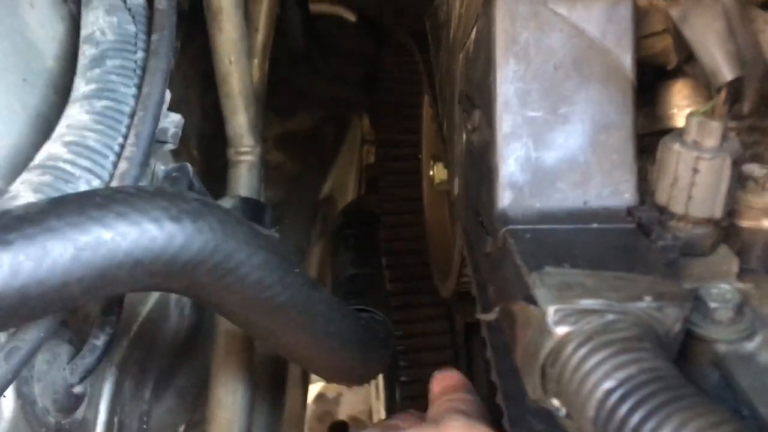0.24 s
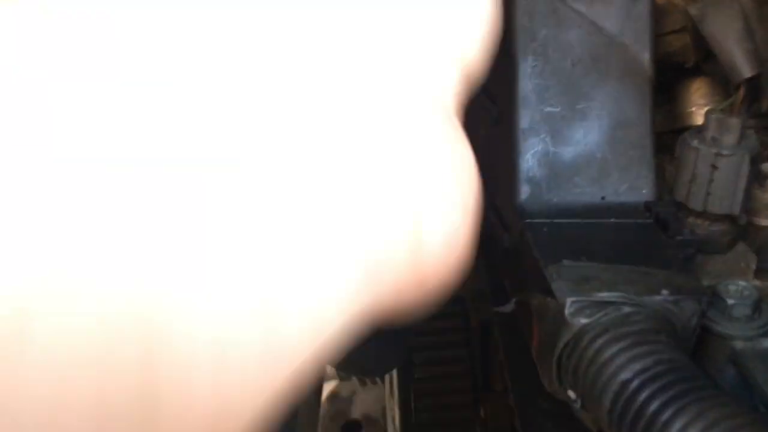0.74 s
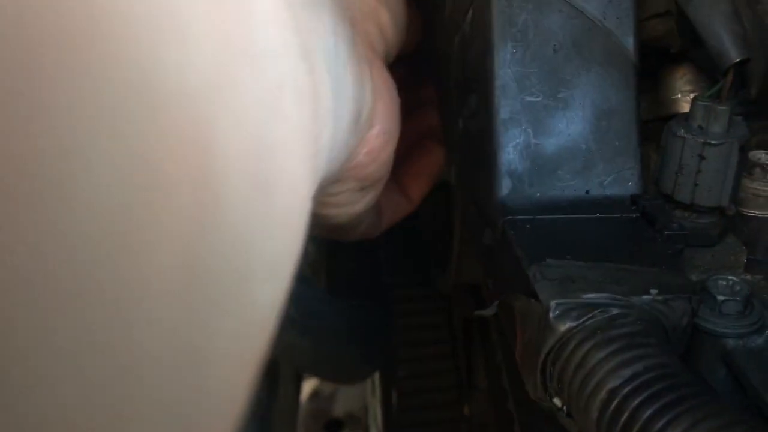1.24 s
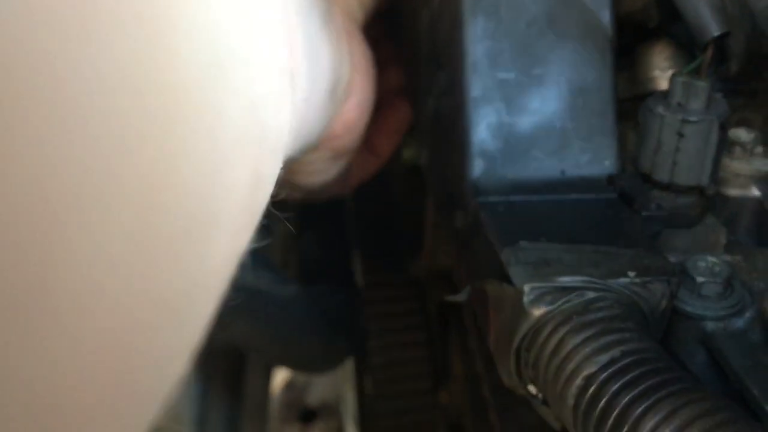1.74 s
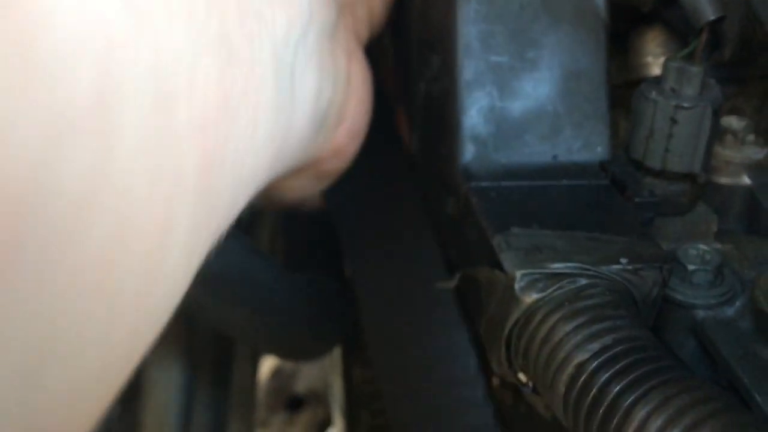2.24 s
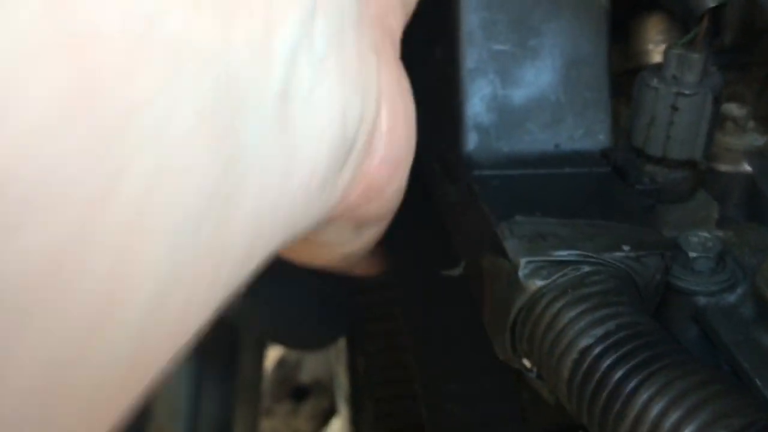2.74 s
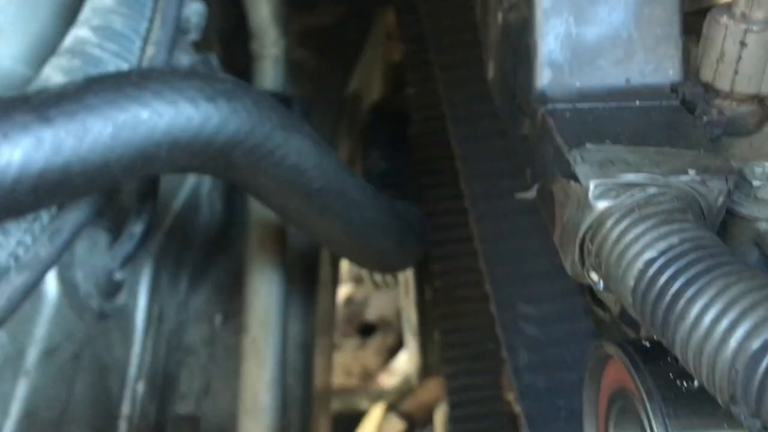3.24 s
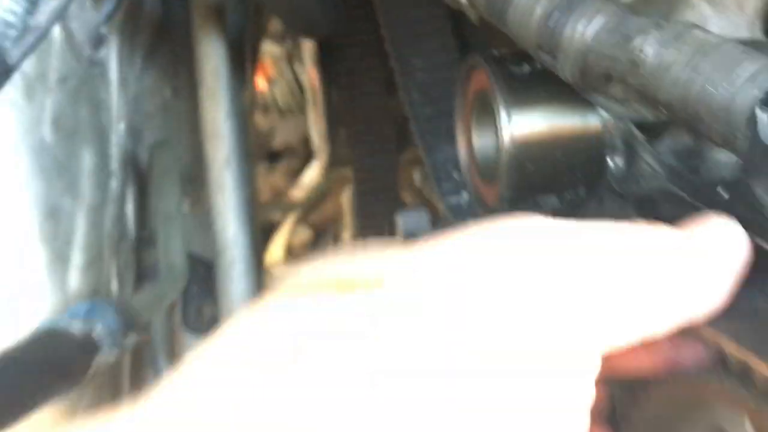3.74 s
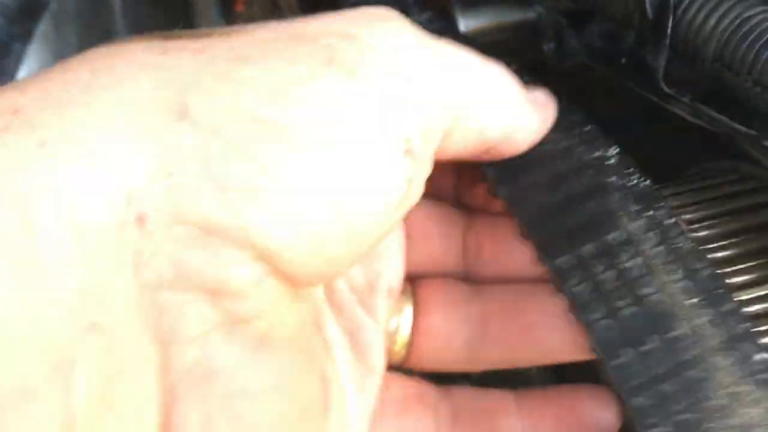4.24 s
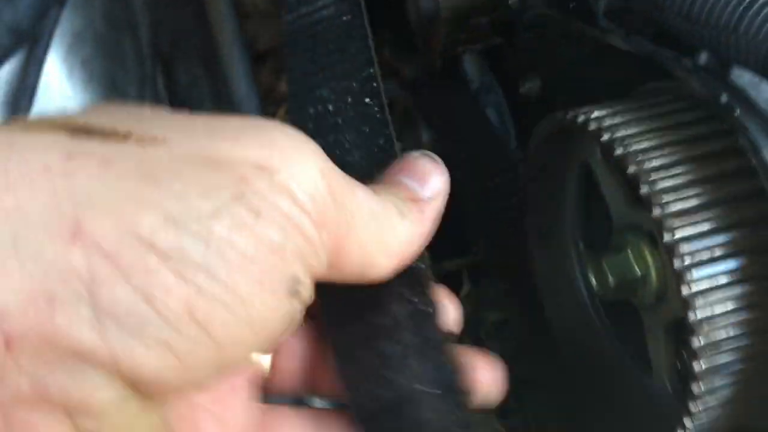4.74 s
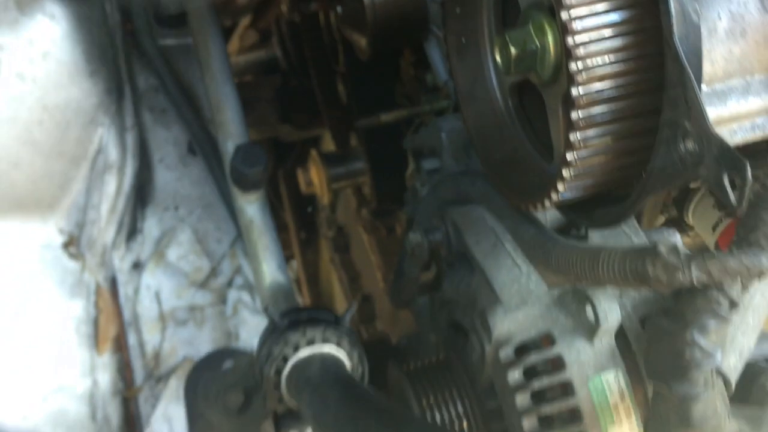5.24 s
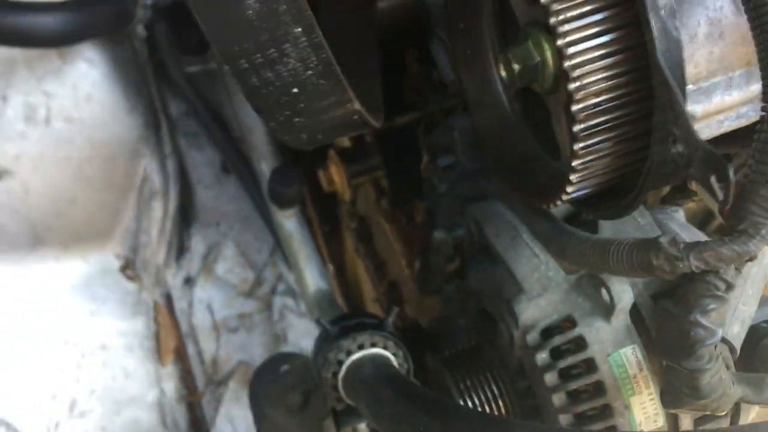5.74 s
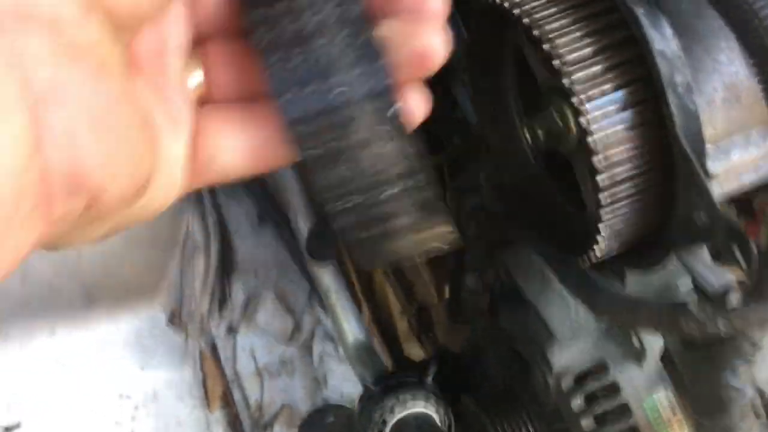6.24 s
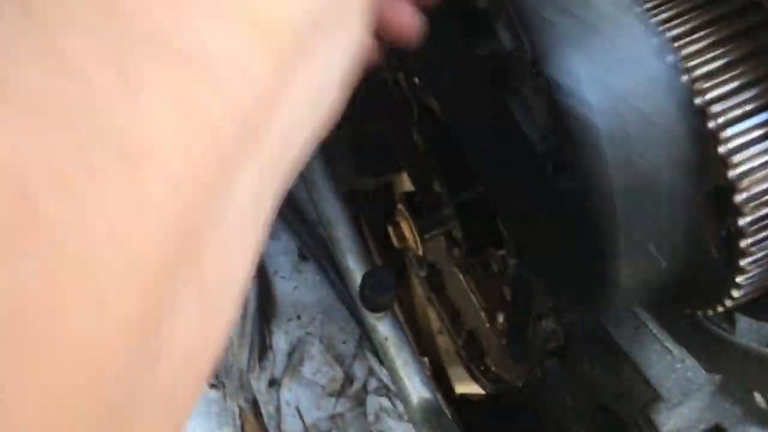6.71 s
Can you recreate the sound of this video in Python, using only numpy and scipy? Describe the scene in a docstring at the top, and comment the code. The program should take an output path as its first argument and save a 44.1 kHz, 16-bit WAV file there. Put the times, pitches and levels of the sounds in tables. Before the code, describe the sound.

One sharp metallic snap, then faint rubbing and ticking as a rubber engine belt is pulled off and slaps against metal in a humming garage.

```python
"""A toothed rubber timing belt is worked off its sprockets by hand in a humming garage.
First a metal part snaps sharply and rings in its modes. Then friction takes over: skin hisses, rubber
rasps and creaks, small parts tick and a steel pulley rings under taps and scrapes. From about 3.5 s the
freed belt slides through the hand, until it slaps hard against the engine at 4.9 s. More rubbing follows,
and a cluster of slaps and pulley rings closes the scene near 6.8 s."""
import sys
import numpy as np
from scipy import signal
from scipy.fft import rfft, irfft, next_fast_len
from scipy.io import wavfile
from scipy.ndimage import uniform_filter1d

SR = 44100
rng = np.random.default_rng(int(sys.argv[2]) if len(sys.argv) > 2 else 0)


def store_wav(level_fs):
    """Save 16-bit WAV to argv[1]."""
    pcm = np.round(np.clip(np.atleast_2d(level_fs), -1, 1) * 32767)
    wavfile.write(sys.argv[1], SR, pcm.T.astype(np.int16))


N = 307377
T = np.arange(N) / SR

# The snap and its rebounds. Each row: start in seconds, level in dB.
SNAP_IMPACTS = [(0.1640, 4.5), (0.1659, 1), (0.1694, -5.5), (0.18, -14), (0.191, -19), (0.1923, -15)]
# Modes of the snapping part. Each row: frequency in Hz, level in dB, t60 in seconds.
METAL_MODES = [(626, -22, 0.16), (868.4, -24, 0.41), (1548, -12, 0.23), (1490, -20, 0.17),
               (1640, -18.5, 0.16), (1770, -12, 0.24), (2210, -8, 0.0967), (2245, -2.5, 0.055),
               (2820, -15, 0.099), (3730, -25, 0.25), (4430, -20, 0.076), (4730, -5.5, 0.093),
               (5830, -3.5, 0.056), (5600, -11, 0.1), (5680, 2.5, 0.088), (6000, -25, 0.12),
               (7540, -19, 0.085), (8030, -23, 0.083), (9860, -26.5, 0.12), (11400, -50, 0.46),
               (12100, -29, 0.11), (12600, -30.5, 0.16)]
# Broad resonances of its crack. Each row: frequency in Hz, bandwidth in Hz, level in dB.
CRACK_RESONANCES = [(717, 61, -13), (1410, 210, -14.5), (1900, 330, -6.5), (2253, 170, 0),
                    (2972, 222, -8.5), (4220, 130, -2), (4333, 120, -9.5), (5103, 52, 7), (5630, 71, 5.5),
                    (5310, 43, 3.5), (7000, 140, -22), (8300, 110, -12.5), (8250, 310, -16.5),
                    (13000, 210, -22)]
# The belt hits the engine. Each row: start in seconds, level in dB, thud in dB, tilt in dB per octave,
# t60 at 1 kHz in seconds.
BELT_SLAPS = [(1.535, -46.5, 7, 0, 0.11), (2.149, -40, -1, 3, 0.056), (2.724, -40.5, -1, -1, .06),
              (2.948, -33.5, -6, -7, 0.048), (3.543, -39.5, -2, -1, 0.033), (4.2, -32, -7, -1.5, 0.06),
              (4.913, -13.5, -1, 0, 0.097), (5.368, -41, -3.5, -2, 0.056), (6.132, -36.5, 25, 2.5, 0.085),
              (6.685, -31, 15, 1, 0.22), (6.729, -32.5, 4, 0, 0.051), (6.743, -35, 11, 2, 0.043),
              (6.816, -19.5, -12.5, -1, 0.11)]
# Small parts are flicked. Each row: start in seconds, level in dB, body in dB, treble corner in Hz,
# t60 at 1 kHz in seconds.
PART_TICKS = [(0.142, -42, -2, 6000, 0.097), (0.5856, -35.5, 2, 14000, 0.061),
              (0.608, -34.5, 0, 11400, 0.019), (2.0018, -32.5, -7.5, 10970, 0.034),
              (2.029, -36, -11, 9000, .03), (2.0717, -42, -19, 5000, 0.046),
              (2.2567, -45, -13, 10000, 0.063), (2.417, -28.5, -13, 10000, 0.032),
              (2.422, -41, -4, 11970, 0.022), (2.579, -40.5, 7, 8500, .03),
              (3.5307, -38, 6.5, 12920, 0.052), (4.029, -35, -5, 6000, 0.028),
              (4.0614, -38, 2, 12000, 0.12), (4.3415, -44, -23, 8000, 0.053),
              (4.5241, -39, 2, 10100, 0.047), (4.605, -41, -15, 8900, 0.032),
              (4.6362, -37, -19, 11000, .053), (5.9657, -37, 3, 8900, 0.086),
              (6.0118, -29, -2.5, 5400, 0.042), (6.029, -31.5, 3, 4470, 0.031),
              (6.3296, -42, -21, 4300, 0.066), (6.688, -26, -3, 4600, 0.032)]
# Modes of the steel pulley. Each row: frequency in Hz, level in dB, t60 in seconds, family (0 or 1).
STEEL_MODES = [(3480, 13, 0.27, 0), (6720, -24, 0.25, 0), (7020, -8, .24, 0), (10860, -21, .25, 0),
               (11410, -30, 0.3, 0), (802, -7, 0.37, 0), (3970, 11.5, 0.22, 1), (1425, -15.5, 1, 1),
               (896, 1, 0.15, 1), (7110, -15.5, 0.22, 1), (7850, -28, 0.2, 1), (9500, -16, 0.22, 1),
               (11440, -12.5, 0.3, 1)]
# Taps on the pulley. Each row: start in seconds, levels of families 0 and 1 in dB.
PULLEY_TAPS = [(0.372, -73.5, -71), (1.289, -74.5, -69), (1.39, -74, -71), (1.605, -76, -58.5),
               (1.701, -74, -66.5), (2.079, -53.5, -68), (2.256, -63, -82), (2.725, -63.5, -76),
               (3.075, -74, -82), (4.03, -77, -68), (4.344, -81, -68), (4.524, -62, -55), (6.027, -58, -59),
               (6.801, -67, -45), (6.818, -54, -37), (6.884, -61, -51)]
# The belt edge scrapes it. Each row: start and length in seconds, levels of families 0 and 1 in dB.
EDGE_SCRAPES = [(0.92, 0.031, -65, -72), (1.76, 0.16, -62, -64), (1.955, 0.06, -42.5, -58),
                (2.66, 0.1, -66, -81), (2.8, 0.35, -78, -87), (3.87, .3, -76, -71),
                (4.56, 0.16, -54.5, -56.5), (4.73, 0.19, -64.5, -63)]
# Hand and arm rub hoses and belt. Each row: start and length in seconds, rasp and hiss levels in dB.
HAND_STROKES = [(0.22, 0.21, -63, -61), (0.45, 0.18, -59, -52), (0.6, .15, -61, -55),
                (0.86, .025, -60.5, -61.5), (0.915, 0.093, -51, -54.5), (1.02, 0.29, -55, -58),
                (1.31, .16, -60, -58.5), (1.51, 0.13, -61.5, -58), (1.74, 0.28, -62, -58.5),
                (1.95, 0.085, -55, -48), (2.05, 0.1, -60, -60.5), (2.185, 0.041, -51.5, -54.5),
                (2.35, 0.06, -57, -53), (2.475, 0.082, -54, -50), (2.62, 0.12, -57, -51.5),
                (2.74, 0.19, -64.5, -58), (2.92, .12, -56, -51.5), (3.42, .13, -65, -63.5),
                (3.615, 0.048, -68, -61), (3.71, .3, -65, -63), (4.01, .125, -52, -55.5),
                (4.14, 0.16, -55.5, -53), (4.49, 0.27, -53, -52), (4.73, 0.3, -53.5, -59.5),
                (5.0, 0.19, -58.5, -62), (5.27, 0.067, -67.5, -65), (5.555, 0.03, -54.5, -58),
                (5.73, 0.13, -60.5, -61.5), (5.97, 0.14, -56, -58), (6.2, 0.28, -57, -60.5),
                (6.596, 0.034, -46.5, -42.5), (6.63, 0.18, -59.5, -61.5), (6.74, 0.2, -53, -51.5)]
# Envelope of the sliding belt. Each row: time in seconds, level in dB.
SLIDE_ENVELOPE = [(3.55, -100), (3.936, -52), (4.06, -53), (4.23, -58.5), (4.436, -56), (4.59, -52),
                  (4.9, -57)]
# Rubber and metal catch. Each row: start and length in seconds, frequency in Hz, level in dB.
CREAK_EVENTS = [(0.189, 0.026, 12700, -42), (0.297, 0.13, 1620, -57.5), (0.632, 0.095, 5350, -59),
                (2.207, 0.033, 1880, -53.5), (2.352, 0.057, 2850, -59), (3.569, 0.34, 710, -64),
                (3.865, 0.13, 1220, -56), (4.028, 0.018, 2600, -52), (4.853, 0.053, 5760, -57),
                (4.959, 0.052, 5200, -58), (5.567, 0.026, 2430, -58), (5.785, 0.029, 2080, -60.5),
                (5.836, 0.027, 3150, -48), (5.985, 0.009, 3830, -42), (6.024, .012, 4150, -33),
                (6.591, 0.068, 2300, -48), (6.78, 0.0074, 3400, -44)]
# Resonators. Each row: frequency in Hz, bandwidth in Hz, level in dB relative to the direct sound.
COVER_MODES = [(149.4, 36, 3), (214, 84, -3), (376, 85, -6), (643, 69, -20), (1148, 59, -2),
               (2050, 270, 0.5), (3350, 180, 8.5)]  # covers and brackets that the belt lands on
BAY_MODES = [(1240, 32, -4), (2110, 60, -7.5), (3570, 11, -2.5), (3880, 22, 3), (5430, 93, -14),
             (6480, 52, -3.5), (9200, 100, -6.5), (11300, 70, -0.5)]  # hollows and steel parts of the engine bay
# Spectra of the noise sources. Each row: frequency in Hz, relative spectral density in dB.
SLAP_SPECTRUM = [(95, -9.5), (150, 5), (360, -0.5), (470, -6.5), (690, 2), (860, -5.5), (1180, -3.5),
                 (2400, -15.5), (6000, -25.5), (15000, -40.5)]
TICK_SPECTRUM = [(120, -17), (700, -4), (2000, -7.5), (4000, -0.5), (5600, -4), (9000, -2), (15000, -4)]
RASP_SPECTRUM = [(700, -20), (1300, -1.5), (2200, 1), (3000, -2.5), (4000, 2), (5500, -12), (8000, -25.5)]
HISS_SPECTRUM = [(2000, -18.5), (4000, -16), (5500, 1), (7000, -0.5), (9000, -1), (10500, -6), (12500, -2),
                 (15500, -6.5)]
SLIDE_SPECTRUM = [(200, -10), (300, 11), (480, -7.5), (1050, 2), (1650, -39), (2180, 0.5), (2700, -5.5),
                  (4500, -20)]
RUMBLE_SPECTRUM = [(22, -31), (32, -16), (44, 2.5), (85, 2.5), (110, 0.5), (135, -8), (165, -5), (215, -14),
                   (280, -21), (370, -22.5), (460, -35.5), (520, -28.5), (660, -28), (1500, -50),
                   (4000, -90.5)]
AIR_SPECTRUM = [(900, -1), (1200, 0), (1700, -6), (2600, -8.5), (4000, -11), (8000, -16.5), (15000, -21)]


def snap(crack_db=-14, ring_db=-23, tail_db=-38):
    """Impact excitation: a metal part lets go, rebounds on its seat and rings; the bay reverberates."""
    out = np.zeros(N)
    grid = np.geomspace(100, 16000, 600)
    power = sum(undb(db) ** 2 / (1 + ((grid ** 2 - hz ** 2) / (grid * width)) ** 2)
                for hz, width, db in CRACK_RESONANCES)
    crack = np.column_stack([grid, 10 * np.log10(power)])
    for start, db in SNAP_IMPACTS:
        add(out, start, undb(db + crack_db) * burst(crack, t60=0.047, slope=0.062, rise_cycles=3.7))
    onset = SNAP_IMPACTS[0][0]
    ringing = sum((-1) ** k * undb(db) * ring(hz, t60) for k, (hz, db, t60) in enumerate(METAL_MODES))
    add(out, onset, undb(ring_db) * ringing)
    bay = [(100, -0.5), (220, 12.5), (450, -6), (700, -2.5), (2000, -8.5), (5500, -19.5), (12000, -26)]
    add(out, onset, undb(tail_db) * burst(bay, t60=0.35, slope=0.086, rise_cycles=0.99))
    return out


def slaps(level_db=-10.5, thud_hz=480):
    """Damped impact: the rubber's smack dies quickly, the slack span thuds and the covers resonate."""
    out = np.zeros(N)
    hz, base_db = np.transpose(SLAP_SPECTRUM)
    for start, db, thud_db, tilt, t60 in BELT_SLAPS:
        shape_db = base_db + thud_db * below(hz, thud_hz) + tilt * np.log2(hz / thud_hz)
        slap = burst(np.column_stack([hz, shape_db]), t60, slope=0.6, rise_cycles=1.4)
        add(out, start, undb(db + level_db) * slap)
    return resonate(out, COVER_MODES)


def ticks(level_db=-7, body_hz=1800):
    """Contact stiffness sets bandwidth: teeth and fingers flick parts; harder contacts reach higher."""
    out = np.zeros(N)
    hz, base_db = np.transpose(TICK_SPECTRUM)
    for start, db, body_db, corner_hz, t60 in PART_TICKS:
        shape_db = base_db + body_db * below(hz, body_hz) + 20 * np.log10(below(hz, corner_hz))
        tick = burst(np.column_stack([hz, shape_db]), t60, slope=0.067, rise_cycles=0.41)
        add(out, start, undb(db + level_db) * tick)
    return out


def pulley(tap_db=-1, scrape_db=-5, bright_db_per_octave=6, impulses=1500):
    """Modal vibration: the contact point weights two mode families; a scrape is a train of tiny taps."""
    out = np.zeros(N)
    chatter = unit(np.bincount(rng.integers(N, size=impulses), rng.choice([-1, 1], impulses), N))
    forces = [chatter * pressure(EDGE_SCRAPES, column) for column in (2, 3)]
    for hz, mode_db, t60, family in STEEL_MODES:
        mode, family = ring(hz, t60), int(family)
        for start, *family_db in PULLEY_TAPS:
            add(out, start, undb(family_db[family] + mode_db + tap_db) * mode)
        octaves_up = max(np.log2(hz / STEEL_MODES[0][0]), 0)
        scrape = signal.fftconvolve(forces[family], mode / np.linalg.norm(mode))[:N] / np.sqrt(2)
        out += undb(mode_db + scrape_db + bright_db_per_octave * octaves_up) * scrape
    return out


def rubbing(rasp_db=-4, hiss_db=-3.5, resting_db=-76.5):
    """Stick-slip friction: rasping rubber, hissing skin and the sliding belt catch and slip together."""
    catch = undb(1.6 * wander(70))
    resting = undb(resting_db)  # the hand never lies quite still
    rasp_gain = undb(rasp_db) * np.hypot(pressure(HAND_STROKES, column=2), resting)
    hiss_gain = undb(hiss_db) * np.hypot(pressure(HAND_STROKES, column=3), resting)
    rasp = rasp_gain * colour(friction(grain_db=2.5), RASP_SPECTRUM)
    hiss = hiss_gain * colour(friction(grain_db=2), HISS_SPECTRUM)
    belt = sliding_belt()
    return catch * (moving_contact(rasp, depth_db=3.5) + moving_contact(hiss, depth_db=2) + belt)


def sliding_belt(drag_db=-4, crackle_db=-6, impulses=1000):
    """Friction and shot noise: the belt drags through the hand while its ribs strike at random."""
    drag = colour(friction(grain_db=2.5), SLIDE_SPECTRUM)
    ribs = np.bincount(rng.integers(N, size=impulses), rng.random(impulses), N)
    rib_spectrum = [(300, -3), (1000, -5), (3000, 1), (6000, -10), (14000, -22)]
    rib_click = burst(rib_spectrum, t60=0.035, slope=0.17, rise_cycles=0.39)
    crackle = unit(signal.fftconvolve(ribs, rib_click)[:N])
    return (undb(drag_db) * drag + undb(crackle_db) * crackle) * envelope(SLIDE_ENVELOPE)


def creaks(level_db=-1, band_ratio=1.1):
    """Forced resonance: quick slips drive one narrow band of the part that catches."""
    out = np.zeros(N)
    for start, length, hz, db in CREAK_EVENTS:
        progress = np.clip(T[:SR // 4] / length, 0, 1)
        band = [(hz / 2, -32), (hz / band_ratio, -12), (hz, 0), (hz * band_ratio, -12), (hz * 2, -32)]
        slips = colour(rng.standard_normal(len(progress)), band)
        swell = slips * np.sin(np.pi * np.sqrt(progress)) ** 2
        add(out, start, undb(db + level_db) * swell / np.linalg.norm(swell) * np.sqrt(length * SR / 2))
    return out


def room(x, wet_db=-24, t60=0.23):
    """Reverberation: bonnet and walls add a weak, dull tail of diffuse reflections."""
    t = T[:SR // 2]
    diffuse = colour(rng.standard_normal(len(t)), [(150, 7), (2000, 0), (6000, -13), (14000, -24)])
    tail = diffuse * decay(t, t60) * (1 - decay(t, 0.05))
    return x + undb(wet_db) * signal.fftconvolve(x, tail / np.linalg.norm(tail))[:N]


def garage(rumble_db=-43.5, hum_hz=119.1, hum_db=-51.5, waver_db=3, air_db=-65):
    """Ambient noise floor: low machine rumble, a wavering mains hum and faint air noise."""
    rumble = colour(rng.standard_normal(N), RUMBLE_SPECTRUM) * undb(rumble_db + 0.81 * wander(2.4))
    phase = 2 * np.pi * np.cumsum(hum_hz + 0.7 * wander(3)) / SR
    hum = np.sqrt(2) * np.sin(phase) * undb(hum_db + waver_db * wander(4))
    return rumble + hum + undb(air_db) * colour(rng.standard_normal(N), AIR_SPECTRUM)


def burst(spectrum, t60, slope, rise_cycles, size=8192):
    """Impulse response of crowded modes: low bands build up later and last longer; t60 holds at 1 kHz."""
    t, hz = T[:size], np.fft.rfftfreq(size, 1 / SR)
    centres = np.geomspace(100, 16000, 23)[:, None]
    spacing = np.log(centres[1] / centres[0])
    filters = np.clip(1 - abs(np.log((hz + 1) / centres)) / spacing, 0, 1) * spectrum_at(hz, spectrum)
    bands = irfft(rfft(rng.standard_normal(size)) * filters, size)
    rise = 1 - np.exp(-(t * centres / rise_cycles) ** 2)
    bands *= rise * decay(t, t60 * (centres / 1e3) ** -slope)
    sound = (np.linalg.norm(filters, axis=1) / np.linalg.norm(bands, axis=1)) @ bands
    return sound / np.sqrt(uniform_filter1d(sound ** 2, size=132).max())  # loudest 3 ms at rms 1


def ring(hz, t60):
    """Free vibration of one mode: a damped sinusoid."""
    t = T[:SR * 3 // 4]
    return np.sin(2 * np.pi * hz * t) * decay(t, t60)


def resonate(x, modes):
    """Sympathetic vibration: nearby parts add their ringing to the direct sound."""
    t = T[:SR // 5]
    response = sum(undb(db) * 2 * np.pi * width / SR * np.exp(-np.pi * width * t)
                   * np.cos(2 * np.pi * hz * t) for hz, width, db in modes)
    return x + signal.fftconvolve(x, response)[:N]


def friction(grain_db, grain_samples=12):
    """Friction noise: dense tiny slips of uneven size."""
    sizes = undb(grain_db * np.minimum(rng.exponential(size=N // grain_samples + 1), 6))
    return unit(rng.standard_normal(N) * np.repeat(sizes, grain_samples)[:N])


def pressure(strokes, column, grip_share=0.21, release_s=0.034, press_db=2.5):
    """Contact pressure sets gain: each stroke builds, peaks halfway and lets go; overlaps add in power."""
    power = np.zeros(N)
    for row in strokes:
        start, length = row[:2]
        t = T[:int((length + release_s) * SR)]
        contact = np.clip(np.minimum(t / (grip_share * length), 1 - (t - length) / release_s), 0, 1)
        swell_db = press_db * (np.sin(np.pi * t / t[-1]) - 1.5)
        add(power, start, (contact * undb(row[column] + swell_db)) ** 2)
    return np.sqrt(power)


def moving_contact(x, depth_db, size=512):
    """Time-varying filtering: brief resonances come and go as the point of contact moves."""
    cells = signal.stft(x, nperseg=size)[2]
    ripple = uniform_filter1d(rng.standard_normal(cells.shape), size=5, axis=0)
    ripple = uniform_filter1d(ripple, size=8, axis=1)
    return signal.istft(cells * unit(undb(depth_db * unit(ripple))), nperseg=size)[1][:N]


def envelope(curve):
    """Gain along a (seconds, dB) curve, fading out at its ends."""
    times, db = np.transpose(curve)
    gate = ((T >= times[0]) & (T <= times[-1])).astype(float)
    return undb(np.interp(T, times, db)) * uniform_filter1d(gate, size=600)


def wander(rate_hz):
    """Smooth random modulation with rms 1."""
    hold = int(SR / rate_hz)
    steps = rng.standard_normal(N)[np.arange(N) // hold]
    return unit(uniform_filter1d(uniform_filter1d(steps, hold), hold))


def colour(x, spectrum):
    """Spectral shaping, scaled to rms 1."""
    n = next_fast_len(len(x))
    return unit(irfft(rfft(x, n) * spectrum_at(np.fft.rfftfreq(n, 1 / SR), spectrum), n)[:len(x)])


def spectrum_at(hz, spectrum):
    """Gain of a (Hz, dB) spectrum, interpolated in log frequency."""
    knots, db = np.transpose(spectrum)
    return undb(np.interp(np.log(np.maximum(hz, 1)), np.log(knots), db))


def below(hz, corner_hz):
    """Low-pass gain with a soft corner."""
    return 1 / (1 + (hz / corner_hz) ** 4)


def decay(t, t60):
    """Exponential decay, 60 dB in t60 seconds."""
    return np.exp(-np.log(1000) * t / t60)


def add(out, start, sound):
    """Superpose a sound at a start time in seconds."""
    i = int(start * SR)
    out[i:i + len(sound)] += sound[:max(N - i, 0)]


def undb(db):
    """Decibels to amplitude ratio."""
    return 10 ** (np.asarray(db) / 20)


def unit(x):
    """Normalise to rms 1."""
    return x / np.sqrt(np.mean(x ** 2) + 1e-20)


def scene():
    """Superposition: the work on the belt and its reflections sound over the garage's noise floor."""
    handling = resonate(ticks() + rubbing(), BAY_MODES)
    direct = snap() + slaps() + creaks() + pulley() + handling
    return (room(direct) + garage())[None]


def record(dry, ceiling=0.9, top_hz=15850):
    """Clipping and band limiting: peaks flatten just under full scale and a steep filter cuts the top."""
    lowpass = signal.ellip(10, 0.1, 80, top_hz, fs=SR, output="sos")
    return signal.sosfilt(lowpass, np.clip(dry, -ceiling, ceiling))


dry = scene()
out = record(dry)
store_wav(out)
```